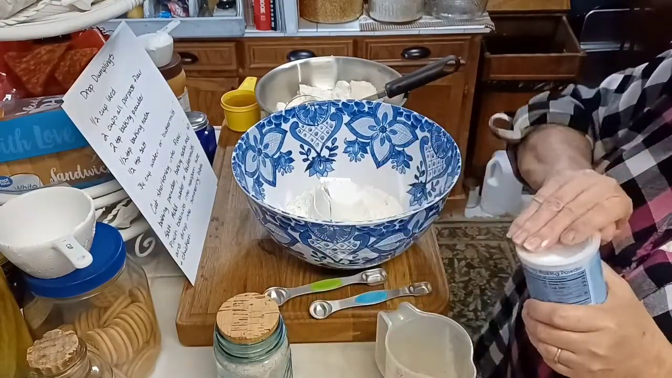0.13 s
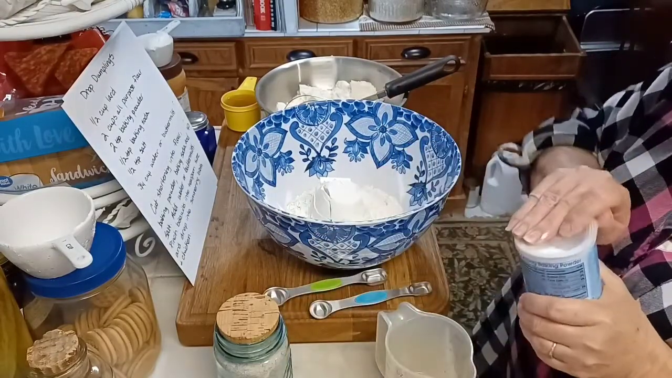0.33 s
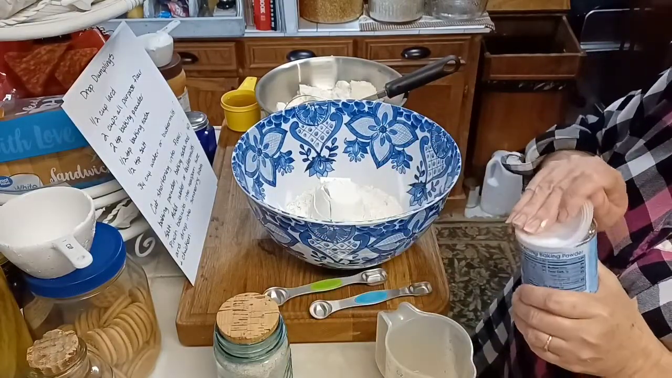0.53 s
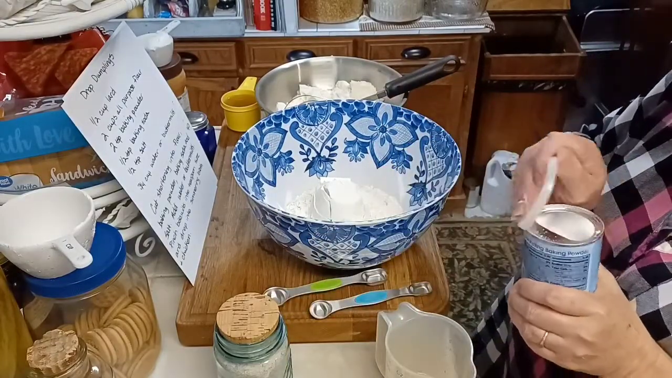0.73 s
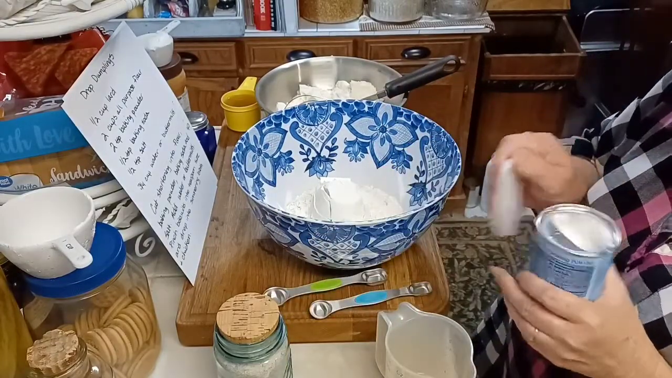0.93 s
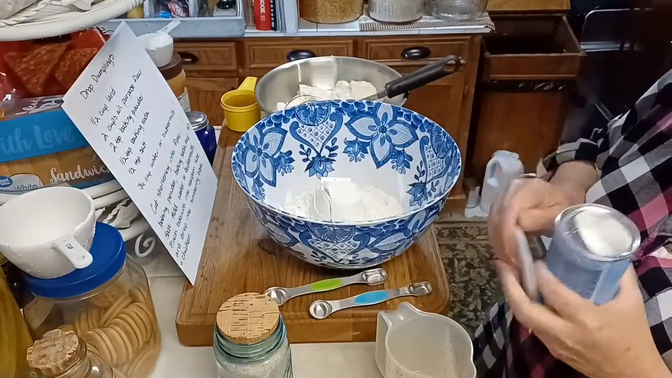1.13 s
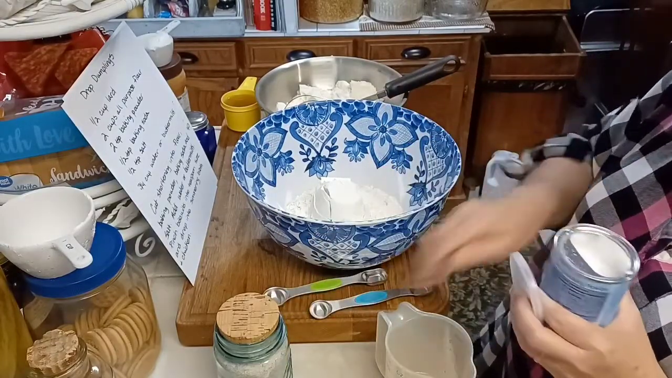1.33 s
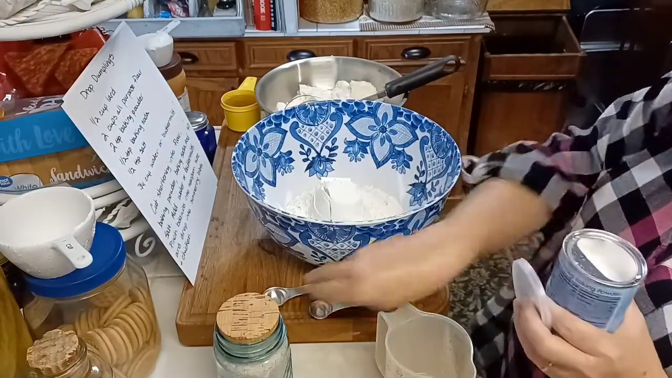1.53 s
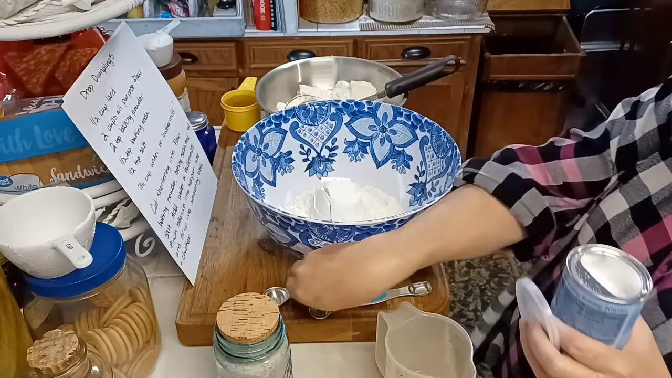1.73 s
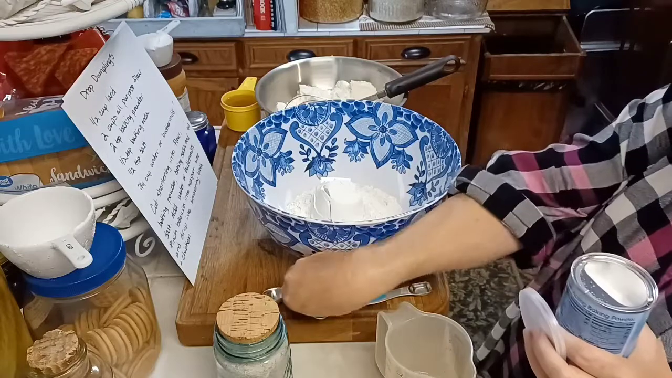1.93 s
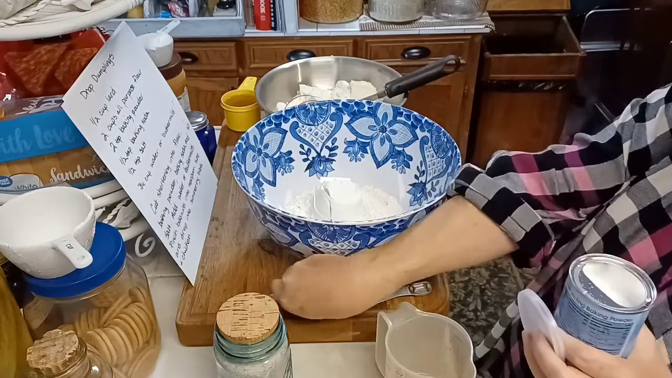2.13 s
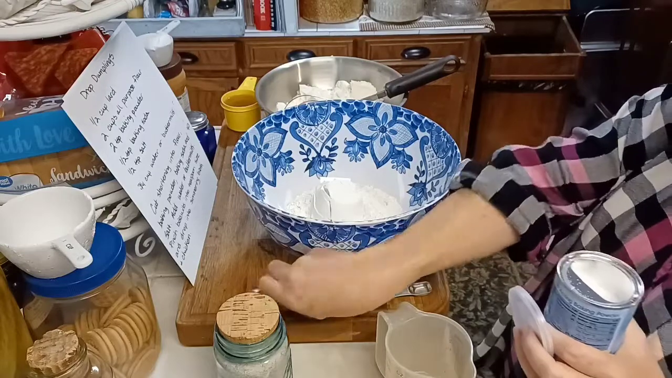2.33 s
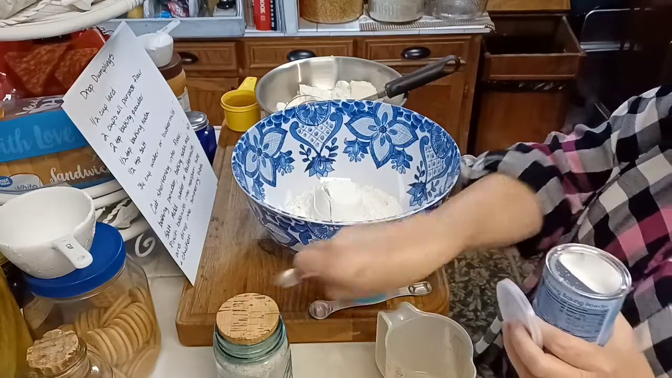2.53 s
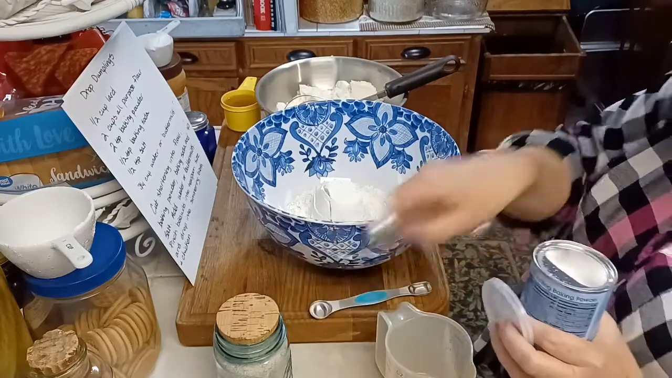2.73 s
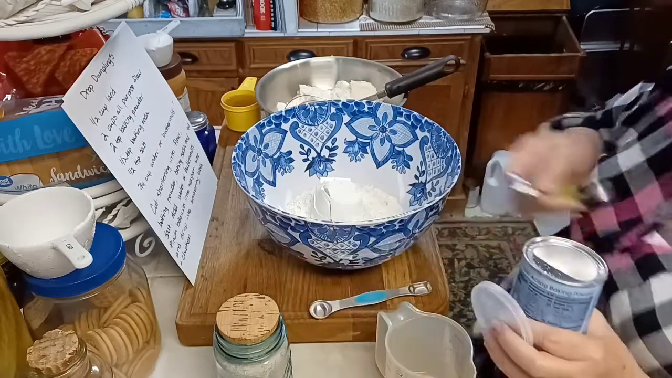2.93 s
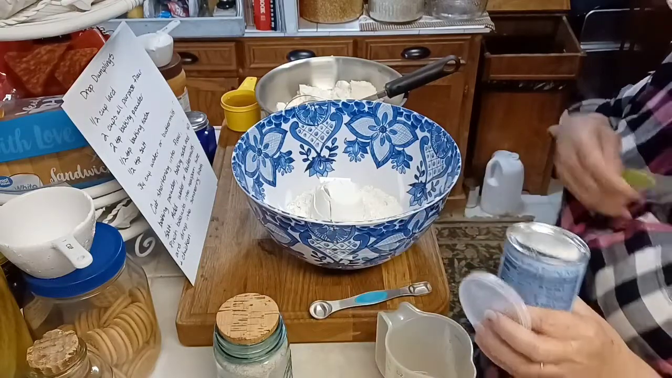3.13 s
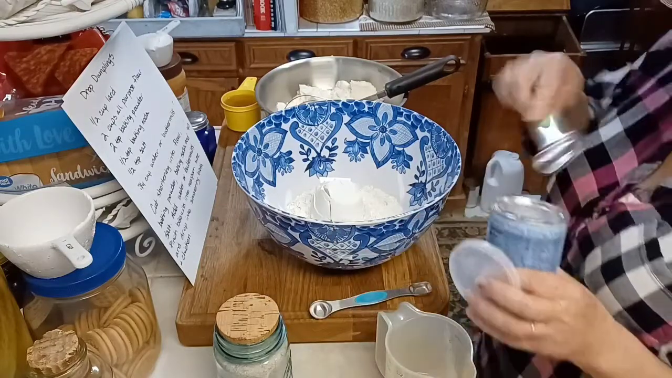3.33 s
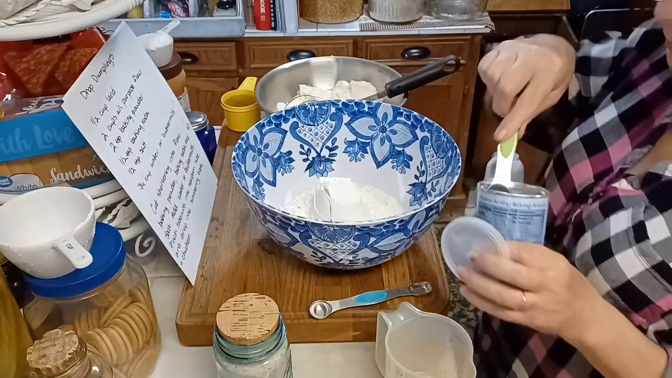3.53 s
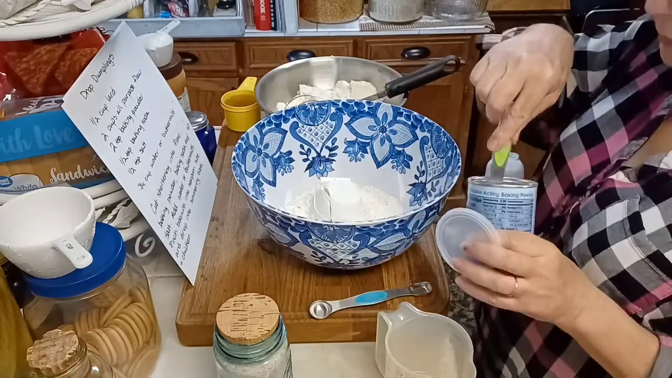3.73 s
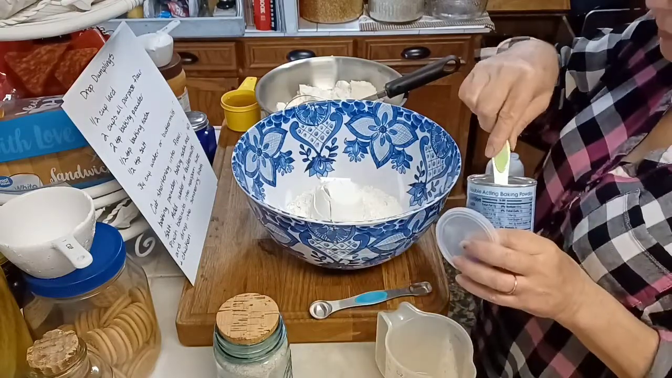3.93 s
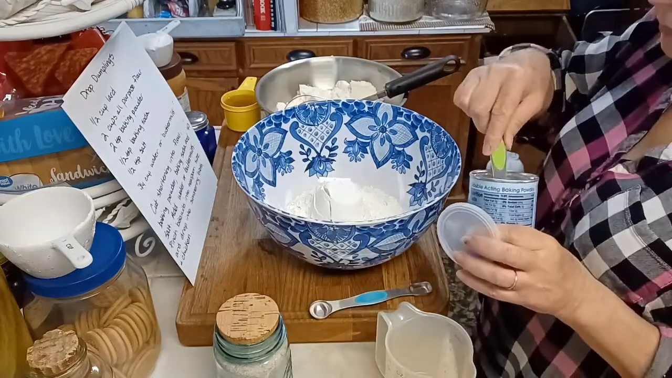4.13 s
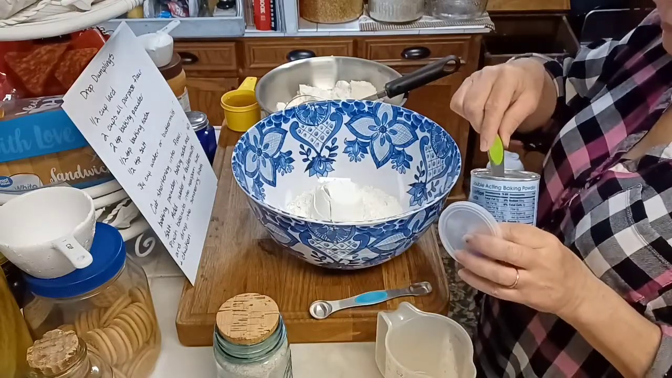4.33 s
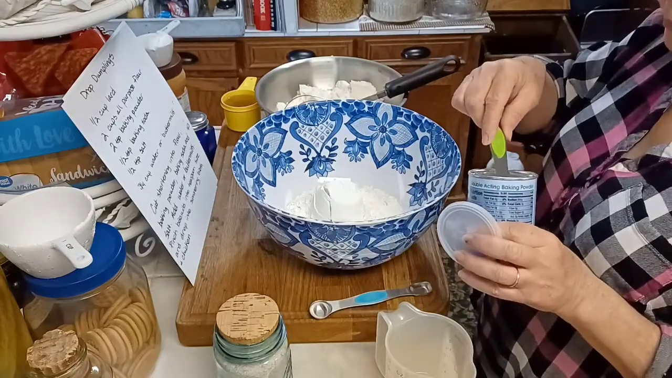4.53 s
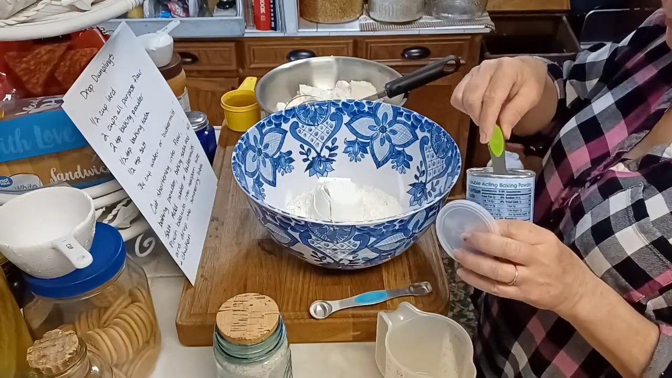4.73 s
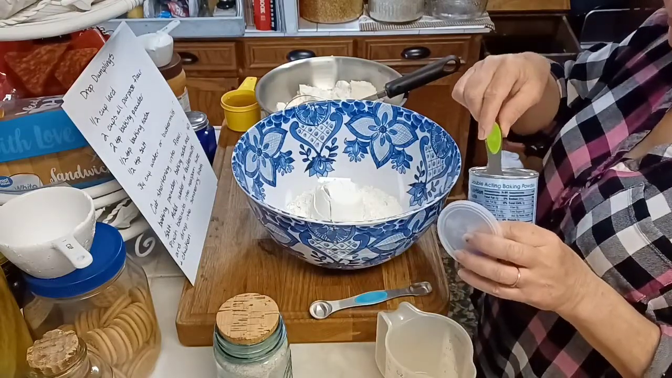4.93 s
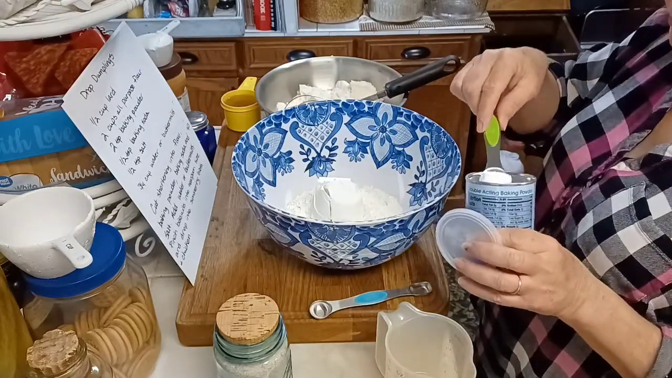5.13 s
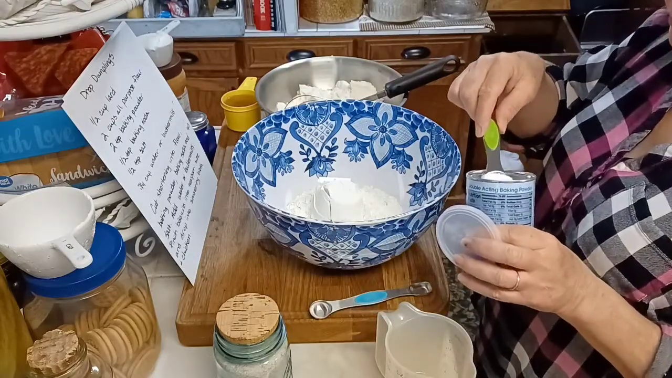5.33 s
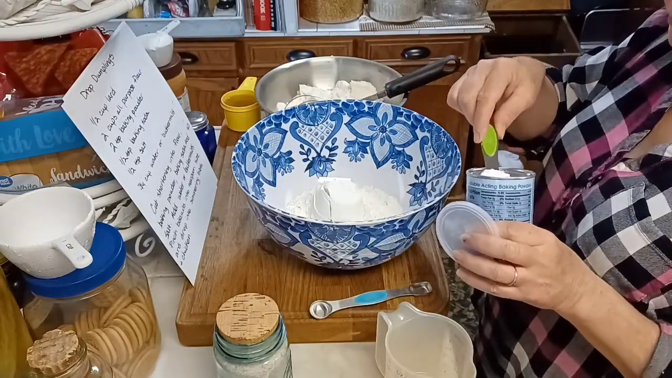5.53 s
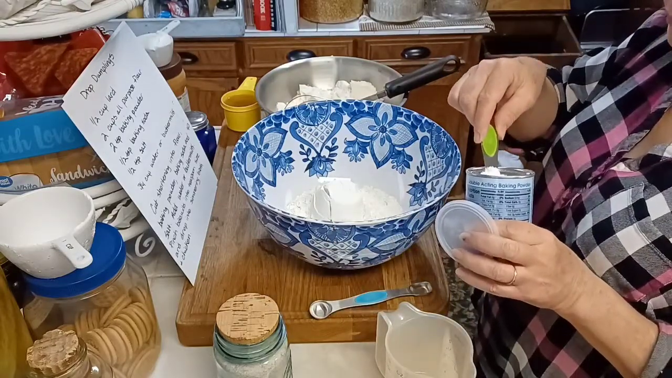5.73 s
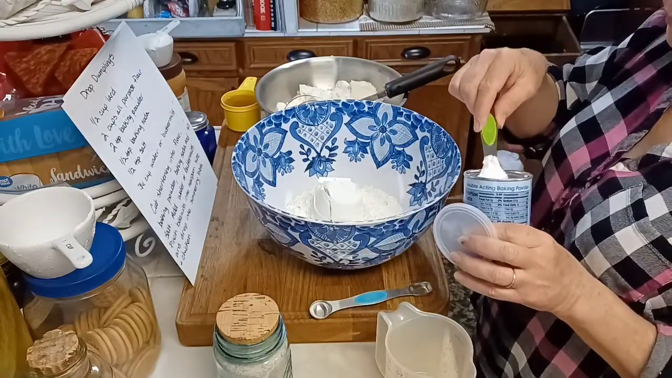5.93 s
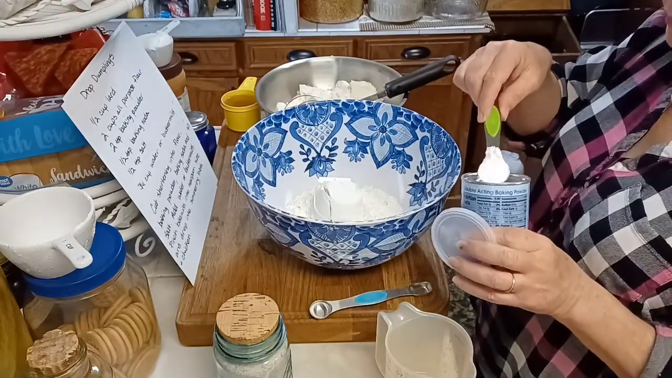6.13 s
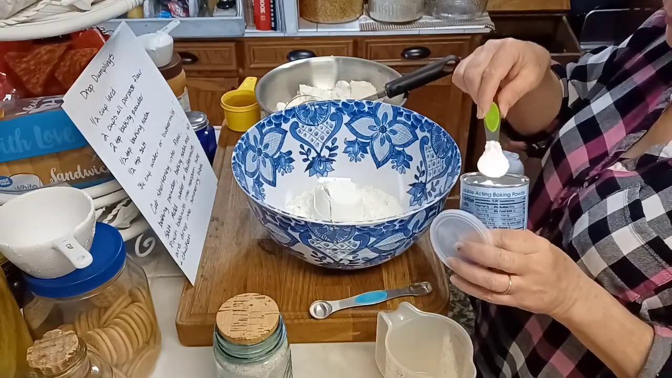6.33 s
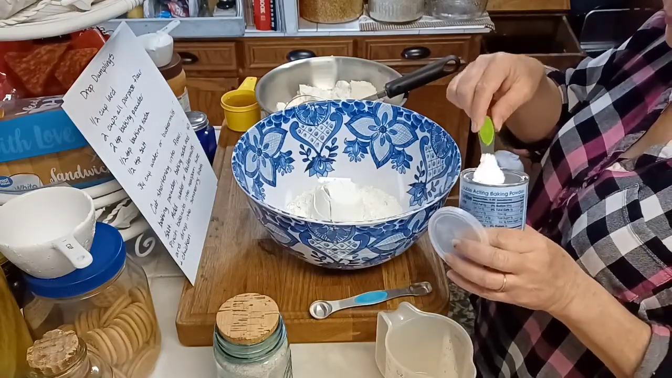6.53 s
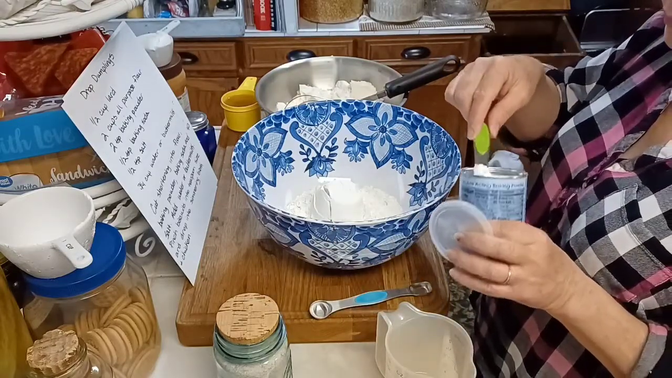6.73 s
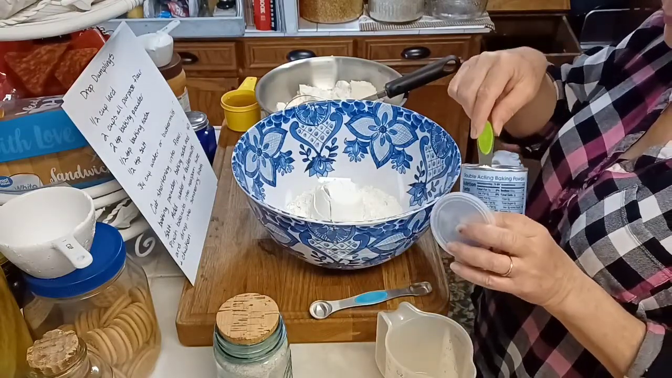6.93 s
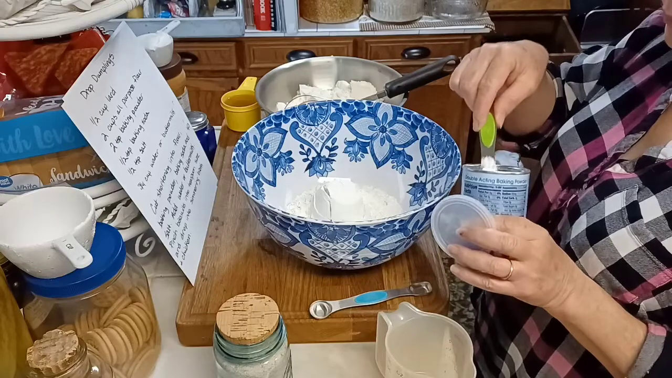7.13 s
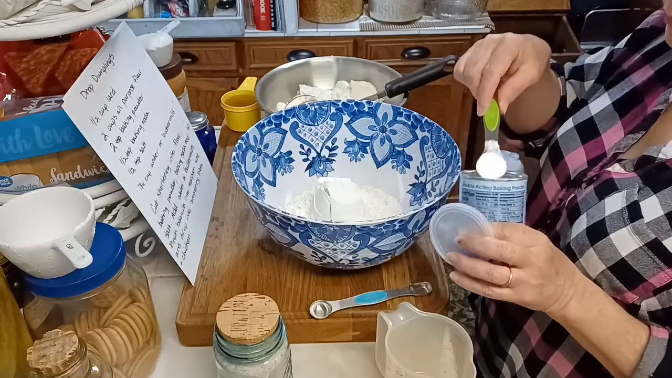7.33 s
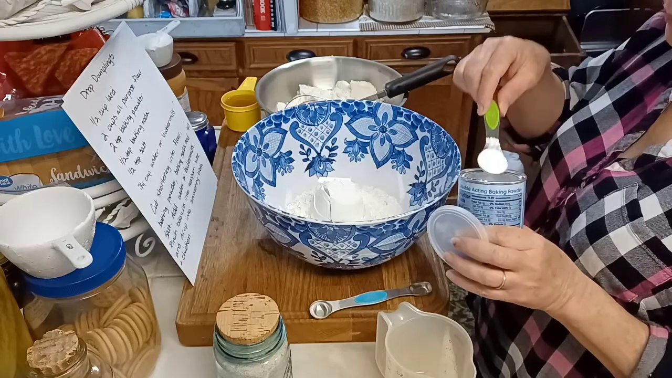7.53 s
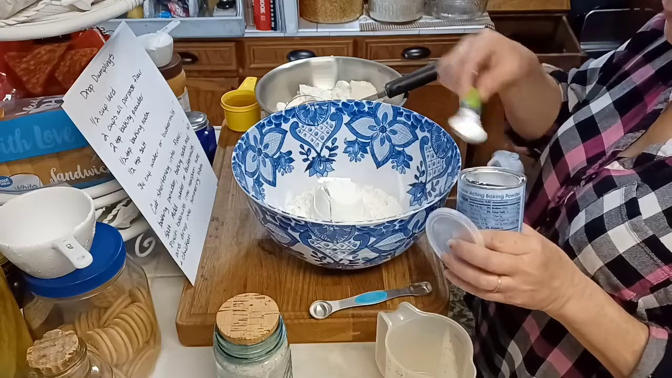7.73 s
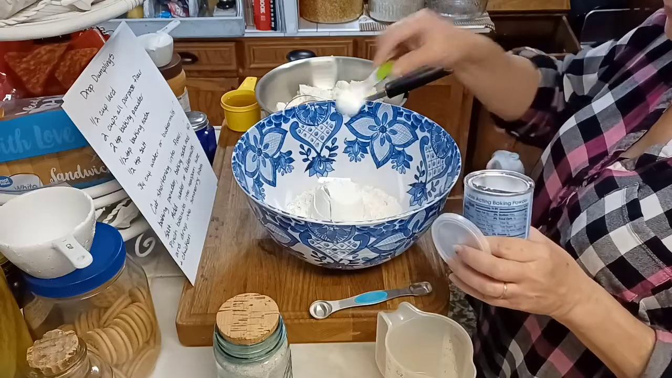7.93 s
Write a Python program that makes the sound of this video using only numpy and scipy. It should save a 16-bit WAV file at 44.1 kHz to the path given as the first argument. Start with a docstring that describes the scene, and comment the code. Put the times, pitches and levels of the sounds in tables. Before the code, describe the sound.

In a quietly humming kitchen, a can's lid thumps off, measuring spoons clink brightly, and a spoon taps and scrapes grittily inside the can.

```python
"""An appliance hums in a small kitchen, with faint swells of high hiss; fingers bump a plastic lid.
The lid pops off a metal can of baking powder, thumping like a small drum as it slips over the rim.
Two steel measuring spoons clatter as one is picked up and the other drops back on a wooden board.
The spoon then knocks in the hollow can, digs through the powder and is scraped level on the rim,
the grains sticking and slipping under it in a gritty hiss."""
import sys
import numpy as np
from scipy import signal
from scipy.fft import rfft, irfft, next_fast_len
from scipy.io import wavfile
from scipy.ndimage import uniform_filter1d, map_coordinates

SR = 44100
rng = np.random.default_rng(int(sys.argv[2]) if len(sys.argv) > 2 else 0)


def wrap_up_sound(samples):
    """Save the sound to the file named by the first command line argument, as 16-bit audio."""
    columns = np.atleast_2d(samples).T
    # keep every value between -1 and 1, then stretch to whole-number steps
    tamed = np.clip(columns, -1, 1)
    steps = np.round(tamed * 32767).astype(np.int16)
    wavfile.write(sys.argv[1], SR, steps)


N = 356769
TIME = np.arange(N) / SR
RING_TIME = np.arange(SR // 2) / SR  # half a second for a ring or a room tail


def amp(db):
    """Decibels to gain."""
    return 10 ** (np.asarray(db) / 20)


def unit(x):
    """Scale to rms 1."""
    return x / np.sqrt(np.mean(x ** 2) + 1e-20)


def curve(points, hz):
    """Read a curve of (f/Hz, value) points on a log frequency axis."""
    freqs, values = np.transpose(points)
    return np.interp(np.log(hz + 1), np.log(freqs), values)


def wobble(rate):
    """A smooth random modulator, rate knots a second."""
    return map_coordinates(rng.standard_normal(int(N * rate / SR) + 4), [TIME * rate])


def filtered(x, response):
    """EQ x with a gain that depends on frequency."""
    n = x.shape[-1]
    padded = next_fast_len(n + SR // 4)
    return irfft(rfft(x, padded) * response(np.fft.rfftfreq(padded, 1 / SR)), padded)[..., :n]


def resonances(modes, hz):
    """Gain of a body whose modes (f/Hz, width/Hz, level/dB) add in power."""
    return np.sqrt(sum(amp(db) ** 2 * (hz * width) ** 2 / ((f * f - hz * hz) ** 2 + (hz * width) ** 2)
                       for f, width, db in modes))


def contact(modes, spread_db=2):
    """Each point of contact excites the modes at new strengths."""
    return [(f, width, db + spread_db * rng.standard_normal()) for f, width, db in modes]


def low_cut(hz, corner_hz):
    """Small things radiate little below their corner frequency."""
    return hz ** 2 / np.sqrt(hz ** 4 + corner_hz ** 4)


def strike(gain):
    """The minimum-phase ring, of energy 1, of a body with this gain over frequency."""
    n = len(RING_TIME)
    cepstrum = irfft(np.log(gain(np.fft.rfftfreq(n, 1 / SR)) + 1e-5), n)
    causal = 2 * cepstrum[:n // 2] * (np.arange(n // 2) > 0)
    ring = irfft(np.exp(rfft(causal, n)), n)
    return ring / np.linalg.norm(ring)


def add(track, s, sound):
    """Mix a sound in at s seconds."""
    part = track[:, round(s * SR):][:, :sound.shape[1]]
    part += sound[:, :part.shape[1]]


# stereo image of diffuse sound: f/Hz, left-right correlation
CORRELATION = [(60, .6), (200, 0.63), (500, 0.61), (1200, 0.1), (3000, 0.075)]
def diffuse(size):
    """Stereo noise, narrow in the bass and wide in the treble."""
    def mid_side_gains(hz):
        angle = np.arccos(np.clip(curve(CORRELATION, hz), -1, 1)) / 2
        return np.array([np.cos(angle), np.sin(angle)])
    mid, side = filtered(rng.standard_normal((2, size)), mid_side_gains)
    return np.array([mid + side, mid - side])


# the kitchen's decay: f/Hz, t60/s
KITCHEN_DECAY = [(200, 0.31), (550, .24), (1400, 0.17), (3700, 0.18), (10000, 0.15), (16000, 0.15)]
def room(x, wet_db, near_db, build_s=0.006, near_s=0.005):
    """Direct sound, a quick scatter from the counter close by, then a fresh kitchen tail."""
    size = len(RING_TIME)
    hz, t, bands = signal.stft(diffuse(size), SR, nperseg=256)
    decay = amp(-60 * t / curve(KITCHEN_DECAY, hz)[:, None])
    tail = signal.istft(bands * decay, SR, nperseg=256)[1][:, :size]
    tail *= 1 - np.exp(-(RING_TIME / build_s) ** 2)
    near = diffuse(size) * np.exp(-(RING_TIME / near_s) ** 2)
    path = (amp(wet_db) * unit(tail) + amp(near_db) * unit(near)) / np.sqrt(size)
    path[:, 0] += 1  # direct sound
    path[0] = np.roll(path[0], shift=4)  # the left ear is farther away
    energy = 1 + amp(wet_db) ** 2 + amp(near_db) ** 2
    return signal.fftconvolve(x[None], path, axes=1) / np.sqrt(energy)


# EQ of the fan's rush: f/Hz, level/dB
FAN_EQ = [(25, -40), (45, -32), (100, -14.5), (150, -15.5), (230, -8), (320, -10.5), (600, -20.5),
          (1000, -32.5), (1700, -34.5), (2600, -41.5), (5800, -46.5), (8000, -42.5), (10500, -48.5),
          (15500, -44.5)]
# motor tones: f/Hz, level/dB
MOTOR_TONES = [(60, -93), (183, -71.5), (241, -67), (296, -75), (323, -76), (366, -85), (460, -80.5),
               (1663, -94)]
def appliance(fan_db=-65.5, hum_gain_db=-1, waver=0.66, pan_left_db=0.63):
    """The bed: a fan's soft rush and its wavering motor tones."""
    fan = amp(fan_db) * unit(filtered(diffuse(N), lambda hz: amp(curve(FAN_EQ, hz))))
    hum = np.zeros(N)
    for hz, db in MOTOR_TONES:
        level = amp(db + hum_gain_db) * np.sqrt(2) * (1 + waver * wobble(12))
        hum += level * np.sin(2 * np.pi * hz * TIME + 2 * waver * wobble(7))
    return (fan + hum) * amp([[pan_left_db], [-pan_left_db]])


# faint soft swells of high hiss: t/s, level/dB
SWELLS = [(.01, -70.5), (.395, -77), (.838, -75), (2.87, -73.5), (3.04, -73), (3.248, -75), (3.811, -76.5),
          (7.6, -80)]
# EQ of that hiss: f/Hz, level/dB
SWELL_EQ = [(1500, -11), (5000, -12), (8000, -3), (10000, -8), (12500, -3), (16000, -22)]
def hiss_swells(half_length_s=0.067):
    """High hiss fades softly in and out with a slight flutter."""
    swell = sum(amp(db) * np.exp(-((TIME - s) / half_length_s) ** 2) for s, db in SWELLS)
    flutter = amp(1.5 * wobble(35))
    hiss = unit(filtered(diffuse(N), lambda hz: amp(curve(SWELL_EQ, hz))))
    return swell * flutter * hiss


def thump(pitch, overtone_db, width_hz, overtone_ratio=1.75, cutoff_ratio=0.96):
    """A soft hit on a small panel: one damped mode and its overtone, low-passed."""
    modes = [(pitch, width_hz, 0), (overtone_ratio * pitch, 2 * width_hz, overtone_db)]
    return strike(lambda hz: resonances(modes, hz) / np.sqrt(1 + (hz / (cutoff_ratio * pitch)) ** 4))


# fingers bump the lid or the board: t/s, level/dB, f/Hz
TAPS = [(0.382, -34.5, 430), (0.4389, -38.5, 525), (.573, -48, 730), (1.16, -43.5, 1044),
        (1.192, -47, 1036), (1.94, -44, 753)]
# EQ of the rim's tick, shared by taps, lid and knocks: f/Hz, level/dB
RIM_EQ = [(150, -29), (300, 1), (800, -16.5), (1900, -3), (3300, -6), (5000, -7), (7300, -12.5),
          (9000, -9.5), (11000, -18), (13500, -14), (16000, -17)]
def finger_taps(gain_db=11, overtone_db_at_1khz=1, overtone_db_per_octave=22, tick_db=-22):
    """Dull finger bumps; the stiffer the spot, the higher its pitch and the stronger its overtone."""
    out = np.zeros((2, N))
    tick = strike(lambda hz: amp(curve(RIM_EQ, hz)))
    for s, db, pitch in TAPS:
        overtone_db = overtone_db_at_1khz + overtone_db_per_octave * np.log2(pitch / 1000)
        bump = thump(pitch, overtone_db, width_hz=130) + amp(tick_db) * tick
        add(out, s, amp(db + gain_db) * room(bump, wet_db=7, near_db=-4.5))
    return out


# the lid's bead slips over the rim in one quick run: t/s, level/dB, f/Hz of the flexing lid
LID_SLIPS = [(.63, -40.5, 845), (.6409, -21, 723), (0.648, -22.5, 1014), (.652, -16.5, 918),
             (0.6592, -18.5, 912), (.687, -31, 885)]
def lid_pop(gain_db=11, tick_db=-17, cavity_db=-16, cavity_hz=898, cavity_t60_s=0.17):
    """Each slip drums the lid and ticks the rim; slips near the pitch of the can's air set it ringing."""
    out = np.zeros((2, N))
    tick = strike(lambda hz: amp(curve(RIM_EQ, hz)))
    cavity = np.sin(2 * np.pi * cavity_hz * RING_TIME) * amp(-60 * RING_TIME / cavity_t60_s)
    cavity /= np.linalg.norm(cavity)
    for s, db, pitch in LID_SLIPS:
        coupling = amp(cavity_db) * resonances([(pitch, 130, 0)], cavity_hz)
        drum = thump(pitch, overtone_db=-12, width_hz=94) + coupling * cavity
        add(out, s, amp(db + gain_db) * room(drum, wet_db=-7.5, near_db=-12, build_s=0.0053))
        add(out, s, amp(db + gain_db + tick_db) * room(tick, wet_db=4, near_db=2.5))
    return out


# the spoons clash: t/s, level/dB, treble tilt/(dB per octave), bowl layer/dB, loss per rebound/dB
CLASHES = [(2.1564, -6, -1.5, -18, 2), (2.2339, -9, -1.5, -3, 13.5), (2.3363, -27.5, -9, -23, 18),
           (2.682, -53.5, 11, -30, 12)]
# modes of the two spoons touching: f/Hz, width/Hz, level/dB
PAIR_MODES = [(408, 270, -18.5), (2050, 83, -10), (2723, 230, -6), (3136, 35, 7), (3460, 530, -0.5),
              (3884, 44, 0.5), (4230, 110, 1.5), (5240, 730, -10.5), (6320, 2300, -12), (7700, 210, -7),
              (8240, 340, -7), (10250, 1100, -11), (11640, 190, -4.5), (13000, 900, -15), (14716, 400, -16)]
# modes of their nested bowls: f/Hz, width/Hz, level/dB
BOWL_MODES = [(1920, 240, -3.5), (2332, 60, -4.5), (2300, 130, -2.5), (3400, 70, -3.5), (4540, 49.6, 2.5),
              (4603, 24, 6), (5100, 40, -9.5)]
def spoon_clatter(gain_db=9, hits=4, first_gap_s=0.0028, gap_growth=3):
    """Each clash chatters on in weaker, ever slower rebounds as the spoons part."""
    out = np.zeros((2, N))
    bowls = strike(lambda hz: resonances(BOWL_MODES, hz) * low_cut(hz, corner_hz=1793))
    for s, db, tilt, bowls_db, loss_db in CLASHES:
        for k in range(hits):
            modes = contact(PAIR_MODES)
            ring = strike(lambda hz: resonances(modes, hz) * amp(tilt * np.log2(1 + hz / 2000)))
            clash = room(ring + amp(bowls_db) * bowls, wet_db=10, near_db=9.5)
            delay = first_gap_s * np.sum(gap_growth ** np.arange(k))
            add(out, s + delay, amp(db + gain_db - k * loss_db) * clash)
    return out


# the spare spoon lands and bounces: t/s, steel level/dB, board level/dB
BOUNCES = [(2.429, -7.5, -25), (2.431, -12, -24), (2.4413, -28, -17.5)]
# modes of the free spoon: f/Hz, width/Hz, level/dB
SPOON_MODES = [(2110, 240, -9.5), (3480, 150, 5.5), (3640, 280, -9), (4050, 210, -4), (5320, 140, -7),
               (6080, 75, 5), (8070, 170, -3.5), (10290, 95, 1.5), (12480, 260, -2.5), (14400, 200, -3.5)]
# modes of the board: f/Hz, width/Hz, level/dB
BOARD_MODES = [(237.5, 36, -0.5), (312, 61, 2.5), (497, 53, -0.5), (665, 33, 1.5), (980, 120, -8.5),
               (1313, 110, -9), (1717, 65, -3.5)]
def spoon_drop(gain_db=9):
    """The free spoon rings bright over the low knock of the wooden board."""
    out = np.zeros((2, N))
    steel = strike(lambda hz: resonances(SPOON_MODES, hz))
    wood = strike(lambda hz: resonances(BOARD_MODES, hz))
    for s, steel_db, board_db in BOUNCES:
        hit = amp(steel_db) * steel + amp(board_db) * wood
        add(out, s, amp(gain_db) * room(hit, wet_db=13, near_db=11))
    return out


# modes of the metal can: f/Hz, width/Hz, level/dB
CAN_MODES = [(866, 64, -11), (1191, 125, -2), (1380, 430, -4.5), (1860, 60, -3.5), (3970, 120, -14.5),
             (4510, 360, -11), (7600, 150, -16), (12580, 250, -40)]
def can_ring(air_hz, air_width_hz, air_db, dip_hz=2500, dip_db=-9):
    """The can and the air above the powder ring: thin bass, a scoop between air and wall modes."""
    modes = contact(CAN_MODES) + [(air_hz, air_width_hz, air_db)]
    dip = lambda hz: amp(dip_db * np.exp(-(5 * (hz / dip_hz - 1)) ** 2))
    return strike(lambda hz: resonances(modes, hz) * low_cut(hz, corner_hz=1000) * dip(hz))


def push(t, length, peak, swell_db, attack_share=0.18, release_s=0.0087):
    """A stroke's envelope t seconds in: it bites, swells to its hardest push, eases and lets go."""
    slack = np.interp(t / length, [0, peak, 1], [1, 0, 1])
    attack = np.clip(t / (attack_share * length), 0, 1)
    release = np.clip((length - t) / release_s, 0, 1)
    return amp(-swell_db * slack) * attack * release


# strokes through the powder and along the rim:
# t/s, length/s, hardest push as share of the length, can wall level/dB, grit level/dB
STROKES = [(3.442, 0.094, 0.79, -54, -46), (4.713, 0.076, 0.54, -56.5, -69),
           (4.836, 0.059, 0.68, -57.5, -65.5), (5.41, 0.09, 0.37, -64, -78),
           (5.478, 0.14, 0.34, -58, -63.5), (5.777, .24, 0.63, -54.5, -80),
           (5.981, 0.215, 0.76, -54.5, -62.5), (7.11, 0.18, .62, -43.5, -54.5),
           (7.252, 0.11, 0.53, -46.5, -57)]
# EQ of the grit: f/Hz, level/dB
GRIT_EQ = [(500, -12.5), (1000, -6.5), (1800, -9), (2400, -2.5), (3400, -4.5), (4700, 1), (6100, -9.5),
           (7700, 2), (9800, -14), (12600, 0), (14000, -16), (16000, -3.5)]
def powder_scrapes(slips_per_s=2000, judder_db=3, wall_gain_db=1.5):
    """Powder grains stick and slip under the spoon: a gritty hiss that also shakes the can."""
    out = np.zeros((2, N))
    step = SR // 25
    slips = (rng.random(N) < slips_per_s / SR) * rng.standard_normal(N)
    slips *= amp(judder_db * wobble(130))
    # keep the grain crackle at a steady level before each stroke shapes it
    slips /= np.sqrt(np.abs(uniform_filter1d(slips ** 2, step)) + 1e-9)
    grit = strike(lambda hz: amp(curve(GRIT_EQ, hz)))[:step]
    for s, length, peak, wall_db, grit_db in STROKES:
        for start in range(round(s * SR), round((s + length) * SR), step):
            t, grains = TIME[start:start + step] - s, slips[start:start + step]
            # the contact point moves on and the colour shifts
            wall = can_ring(air_hz=1276, air_width_hz=70, air_db=3.6)[:step]
            rub = signal.fftconvolve(push(t, length, peak, swell_db=17.5) * grains, wall)
            hiss = signal.fftconvolve(push(t, length, peak, swell_db=5.5) * grains, grit)
            scrape = amp(wall_db + wall_gain_db) * rub + amp(grit_db) * hiss
            add(out, start / SR, room(scrape, wet_db=5.5, near_db=1))
    return out


# the spoon knocks in the can: t/s, ring level/dB, f/Hz of the air above the powder, click level/dB
KNOCKS = [(3.4455, -27.5, 1257, -46), (3.526, -28.5, 1306, -36), (3.583, -29, 1430, -27.5),
          (4.658, -28, 1172, -22.5), (4.895, -35, 1283, -44.5), (5.393, -38.5, 1205, -41),
          (5.788, -41.5, 1293, -70), (5.811, -40, 1234, -60), (6.169, -27.5, 1271, -39.5),
          (6.517, -23.5, 1308, -39), (7.371, -31.5, 1320, -43.5)]
def can_knocks(gain_db=10):
    """The spoon rings the can and clicks on the rim; its depth in the opening tunes the air inside."""
    out = np.zeros((2, N))
    click = strike(lambda hz: amp(curve(RIM_EQ, hz)) * low_cut(hz, corner_hz=345))
    for s, ring_db, air_hz, click_db in KNOCKS:
        ring = can_ring(air_hz, air_width_hz=55, air_db=12)
        add(out, s, amp(gain_db + ring_db) * room(ring, wet_db=5, near_db=3))
        add(out, s, amp(gain_db + click_db) * room(click, wet_db=16, near_db=10))
    return out


def scene():
    """The action at the counter over the appliance's bed."""
    return (appliance() + hiss_swells() + finger_taps() + lid_pop()
            + spoon_clatter() + spoon_drop() + powder_scrapes() + can_knocks())


def record(dry):
    """A steep high cut at 15.7 kHz on the whole mix."""
    return filtered(dry, lambda hz: 1 / (1 + (hz / 15700) ** 200))


dry = scene()
out = record(dry)
wrap_up_sound(out)
```